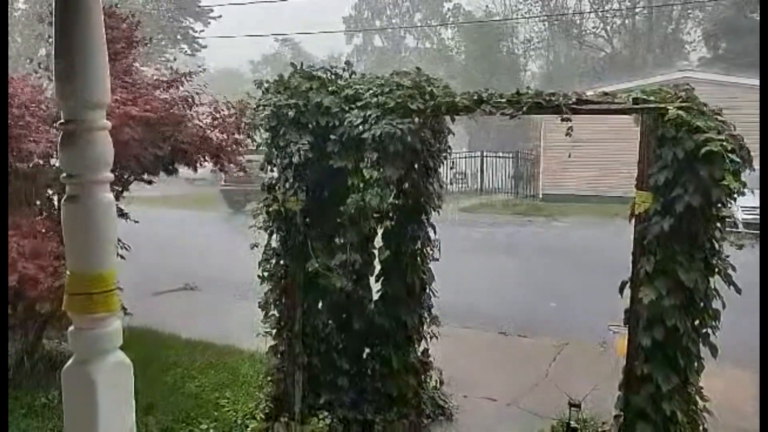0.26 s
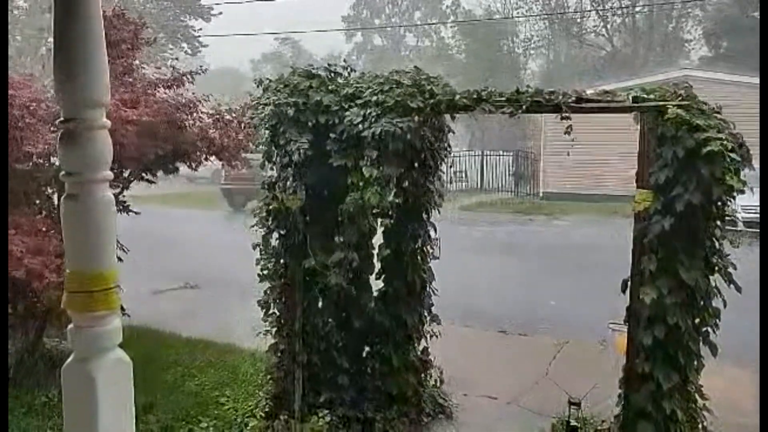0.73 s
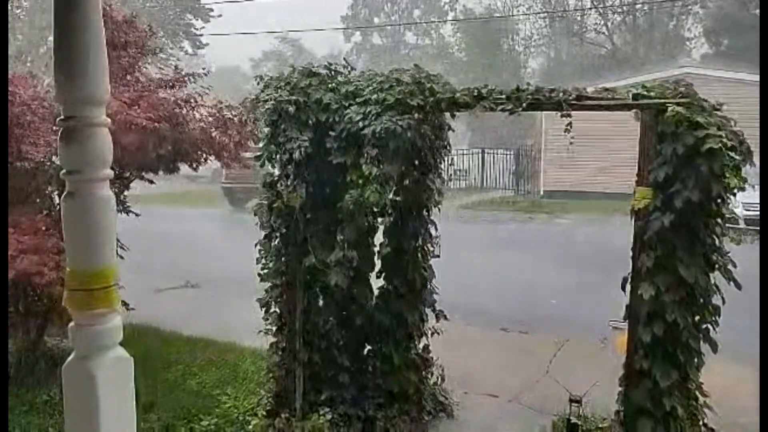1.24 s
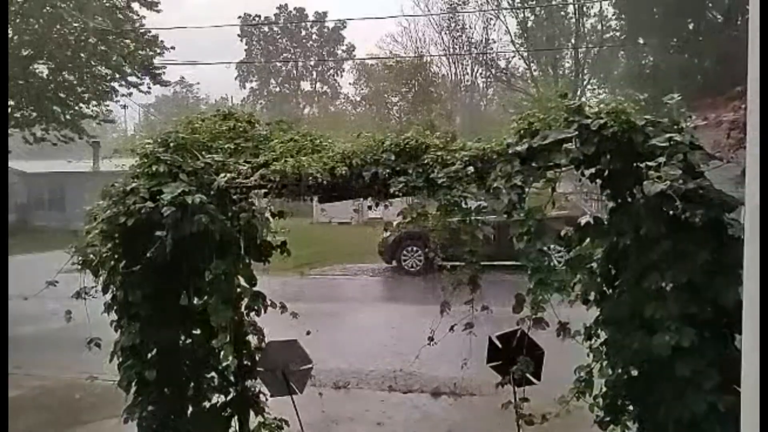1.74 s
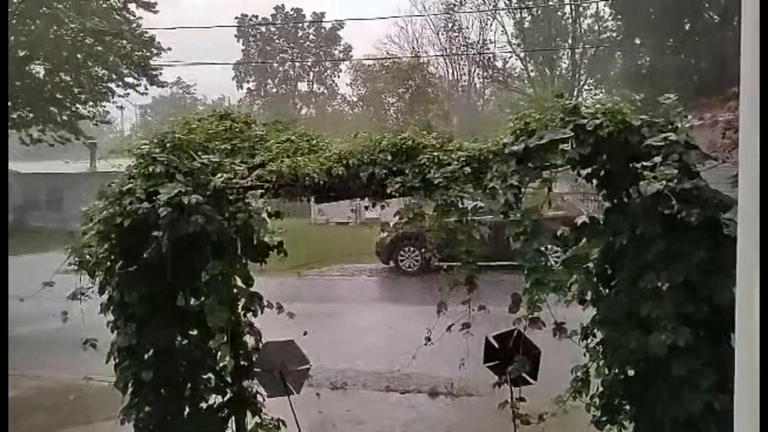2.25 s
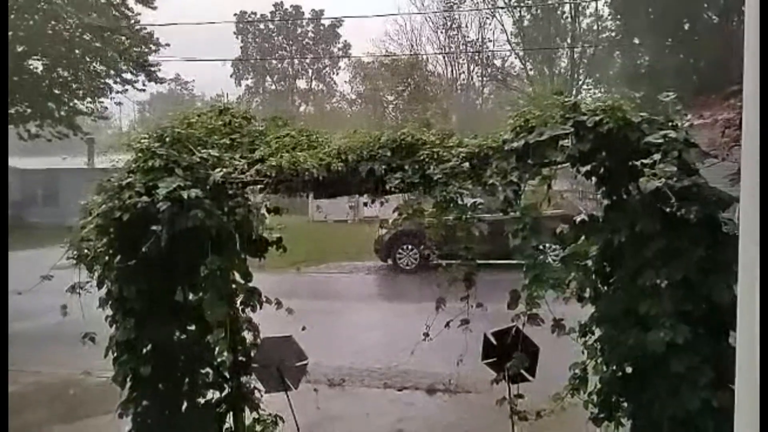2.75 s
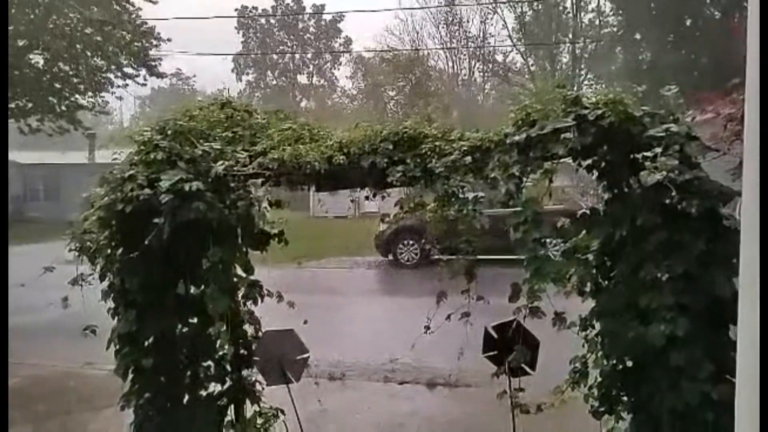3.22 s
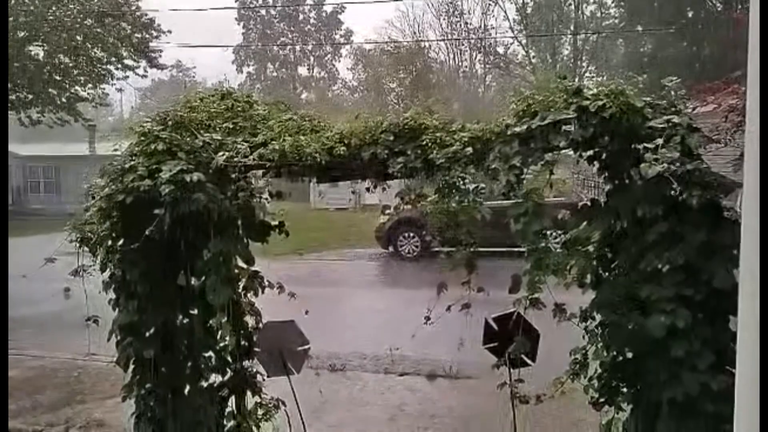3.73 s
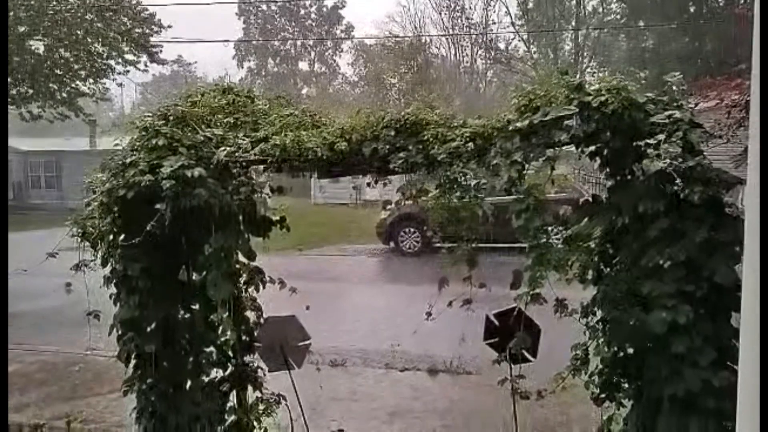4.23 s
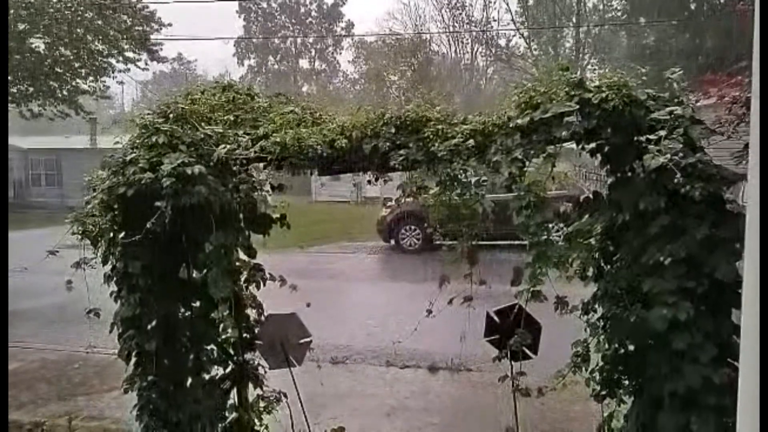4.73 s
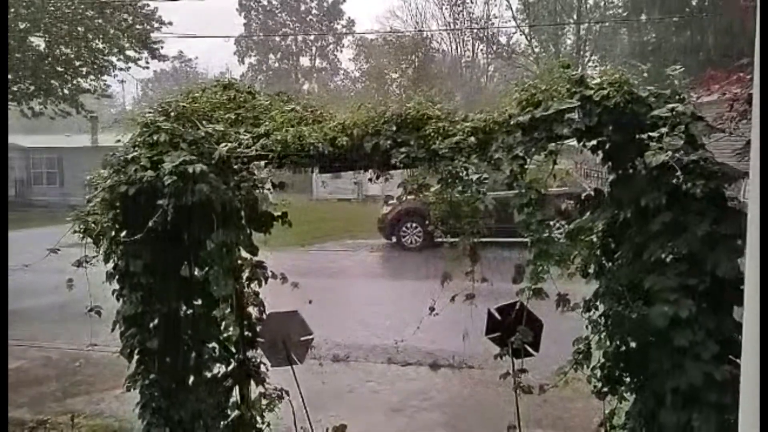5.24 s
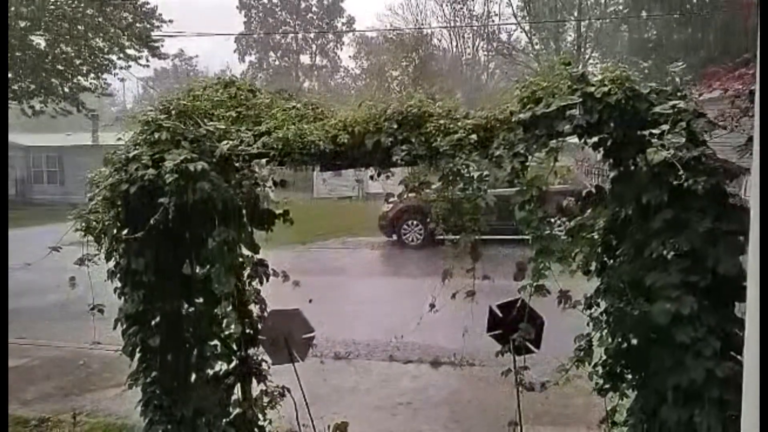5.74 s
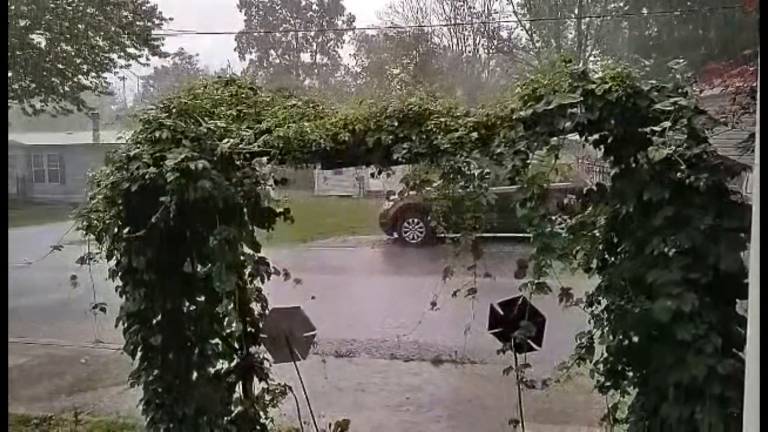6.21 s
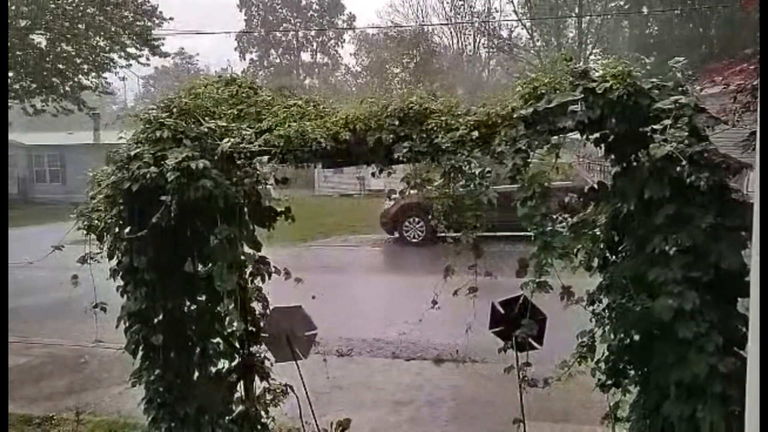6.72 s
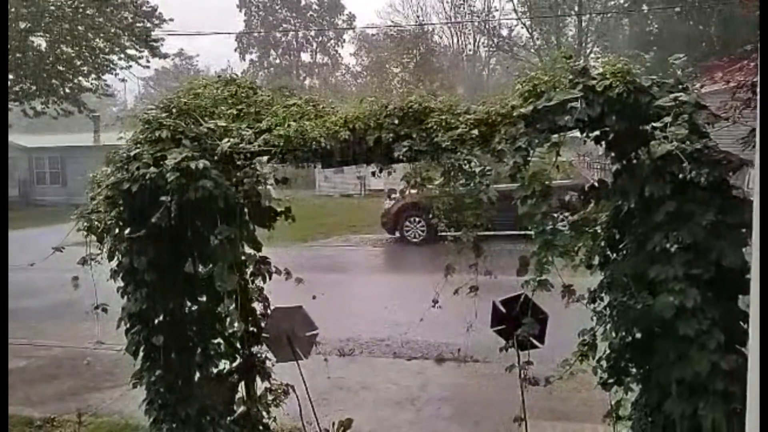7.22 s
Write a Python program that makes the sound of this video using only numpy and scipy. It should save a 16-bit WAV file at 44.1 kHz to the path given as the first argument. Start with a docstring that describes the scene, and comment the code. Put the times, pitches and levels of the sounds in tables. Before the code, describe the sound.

A wavering, windy downpour drops out for a third of a second, then returns as a dense, even rain roar dotted with close drip knocks.

```python
"""Heavy rain on road, lawn and vines, heard from a porch through two ports 0.16 m apart.
First a windy spot: roar wavering left and right, treble spray, low wind; then silence for a third of a second.
A steadier spot follows: the roar starts soft and settles, with a low thump soon after, then porch knocks;
it dips briefly once. Close ticks fall at both spots. Rain is dense noise splashes from sixteen directions,
coloured by band; nearer drops are decaying sines, knocks and ticks noise bursts through resonances."""
import sys
import numpy as np
from scipy import signal
from scipy.fft import rfft, irfft, next_fast_len
from scipy.io import wavfile
from scipy.ndimage import uniform_filter1d

SR = 44100
rng = np.random.default_rng(int(sys.argv[2]) if len(sys.argv) > 2 else 0)


def bounce(signal):
    """Save signal as a 16-bit WAV file at the path given by the first command-line argument."""
    frames = np.transpose(np.atleast_2d(signal))
    limited = np.clip(frames, -1, 1)
    pcm = np.round(limited * 32767).astype(np.int16)
    wavfile.write(sys.argv[1], SR, pcm)


N = 329427
T_S = np.arange(N) / SR

PORT_GAP_M, SOUND_M_PER_S = 0.1582, 343
SILENT_FROM_S, SILENT_TO_S = 1.199, 1.529
WINDY = T_S < SILENT_TO_S


def undb(db):
    """Amplitude gain of a level in dB."""
    return 10 ** (np.asarray(db) / 20)


def unit(x):
    """Scale to RMS 1, both ports together."""
    return x / np.sqrt(np.mean(x ** 2))


def read(table):
    """Columns of a time table, interpolated to one value a sample."""
    time_s, *columns = np.transpose(table)
    return [np.interp(T_S, time_s, column) for column in columns]


def colour(hz, table):
    """Gains of (Hz, dB, ..) points on a log-frequency axis."""
    table_hz, *columns_db = np.transpose(table)
    return undb([np.interp(np.log(hz + 1), np.log(table_hz), db) for db in columns_db])


def sides(pan_db):
    """Left and right gains of a left-minus-right level."""
    return undb(np.array([pan_db, -pan_db]) / 2)


def walk(changes_per_s):
    """Random levels, held and slewed twice; spread near 1."""
    hold = int(SR / changes_per_s)
    held = np.repeat(rng.standard_normal(N // hold + 1), hold)
    slewed = uniform_filter1d(uniform_filter1d(held, hold), hold)
    return 0.87 * slewed[:N]


def bump(middle_s, half_length_s):
    """One smooth rise and fall, height 1."""
    phase = np.clip((T_S - middle_s) / half_length_s, -1, 1)
    return np.cos(np.pi / 2 * phase) ** 2


def band(hz, width_hz):
    """Bandpass resonance, top edge held below Nyquist."""
    edges_hz = [hz - width_hz / 2, min(hz + width_hz / 2, SR / 2.2)]
    return signal.butter(2, edges_hz, "band", fs=SR, output="sos")


def sizes(chance, spread_db):
    """Drop sizes in dB: many small, few big; the largest break up in the air."""
    return spread_db * np.minimum(-np.log(1 - chance), 4)


def levels():
    """Gains of the roar at each port and of the spray: gusty at first, then settling to a steady pour."""
    # roar at the windy spot, slow course: (time [s], level [dB], left minus right [dB])
    roar_windy_spot = [(0, -21, -2.5), (.3, -20.5, -3.5), (.56, -23.5, -3), (.86, -24, -1.5),
                       (.95, -21.5, -3), (1.13, -17.5, 2), (1.195, -18.5, -1.5)]
    # gusts shifting the roar between ports: (middle [s], half length [s], left [dB], right [dB])
    gust_table = [(.105, 0.068, 5.5, 0), (.19, 0.14, 1, 1.5), (0.375, 0.07, 3, 1.5), (0.477, 0.04, 2, 1.5),
                  (0.604, 0.015, 6, -1), (0.658, 0.046, 1, 3), (0.74, 0.1, 6, 2), (0.787, 0.058, -2.5, 3),
                  (0.823, 0.04, 5, -0.5), (0.906, 0.074, 5.5, 0.5)]
    steady_roar_db, steady_pan_db, steady_rise_db_per_s = -17, -1, 0.0931
    windy_spray_db, steady_spray_db = -31.5, -33
    settle_db, settle_s = -5.5, 0.08
    dip_s, dip_half_length_s, dip_db = 4.8, 0.097, -2.5

    windy_db, windy_pan_db = read(roar_windy_spot)
    gusts_db = sum(np.outer(port_db, bump(s, half_s)) for s, half_s, *port_db in gust_table)
    windy_roar = undb(windy_db + gusts_db) * sides(windy_pan_db)

    since_s = T_S - SILENT_TO_S
    course_db = dip_db * bump(dip_s, dip_half_length_s) + steady_rise_db_per_s * since_s
    settling_db = settle_db * np.exp(-np.abs(since_s) / settle_s)
    steady_roar = undb(steady_roar_db + course_db + settling_db) * sides(steady_pan_db)[:, None]

    roar = np.where(WINDY, windy_roar, steady_roar)
    # the spray does not settle
    spray = undb(np.where(WINDY, windy_spray_db, steady_spray_db + course_db))
    return roar, spray


def wind(level_db=-45, centre_hz=130, gust_db=2.):
    """Low buffeting at the windy spot: band noise, unrelated at the two ports."""
    edges_hz = [centre_hz / 1.7, centre_hz * 1.5]
    low_band = signal.butter(3, edges_hz, "band", fs=SR, output="sos")
    low = signal.sosfilt(low_band, rng.standard_normal((2, N)))
    gusts = undb(gust_db * np.array([walk(19), walk(14)]))
    return unit(low * gusts) * undb(level_db) * WINDY


def fizz(per_s=120, level_db=-39, spread_db=3, fade_s=0.0038):
    """Small droplets ticking on leaves near each port: fading treble noise splashes."""
    chance = rng.random((2, 2, N))
    drops = (chance[0] < per_s / SR) * undb(sizes(chance[1], spread_db))
    fade = signal.lfilter([1], [1, -np.exp(-1 / fade_s / SR)], drops)
    splash = fade * rng.standard_normal((2, N))
    return undb(level_db) * signal.sosfilt(band(10500, 6000), splash)


def patter(roar, count=2000, level_db=-4, spread_db=2.5, low_hz=750, octaves=2.306, cycles=4.6, hollow_gain=3.3):
    """Nearer drops on leaves, boards and puddles: each swells softly and rings, longer on hollow things."""
    out, t_s = np.zeros((2, N)), np.arange(int(.07 * SR)) / SR
    port_sign = np.array([[1], [-1]])
    for when, pitch, size, angle, hollow in rng.random((count, 5)):
        hz = low_hz * 2 ** (octaves * pitch)
        slant = np.cos(np.pi * angle)
        delay_s = (1 + slant * port_sign) * PORT_GAP_M / 2 / SOUND_M_PER_S
        late_s = np.maximum(t_s - delay_s, 0)
        age = late_s * hz / (cycles * (1 + hollow_gain * hollow ** 2))
        swell = 1 - np.exp(-6 * age)
        ring = np.sin(2 * np.pi * hz * late_s) * np.exp(-2 * age) * swell
        i = int(when * (N - len(t_s)))
        out[:, i:i + len(t_s)] += ring * undb(sizes(size, spread_db))
    highpass = signal.butter(2, low_hz / 2, "high", fs=SR, output="sos")
    return signal.sosfilt(highpass, out) * roar * undb(level_db)


def drips(table, fade_s, width_share, strike):
    """Each drop is a strike and a sharp burst of noise ringing one broad resonance."""
    out, t_s = np.zeros((2, N)), np.arange(int(.15 * SR)) / SR
    for s, peak_db, hz, pan_db in table:
        noise = rng.standard_normal((2, len(t_s))) * np.exp(-t_s / fade_s)
        push = noise + strike * (t_s == 0)
        ring = band(hz, width_share * hz)
        burst = signal.sosfilt(np.r_[ring, ring], push)
        burst = burst / np.abs(burst).max() * undb(peak_db) * sides(pan_db)[:, None]
        i = int(s * SR)
        out[:, i:i + len(t_s)] += burst[:, :N - i]
    return out


def downpour(size, per_s=500, spread_db=3.5, splash_s=0.0045, far_db=4):
    """Spectra at both ports of drops from sixteen directions (per_s each), over a far even wash."""
    hz = np.arange(size // 2 + 1) * SR / size
    out = 0
    for turn in range(16):
        chance = rng.random((2, N))
        drops = (chance[0] < per_s / SR) * undb(sizes(chance[1], spread_db))
        # each drop is a splash that fades
        power = signal.lfilter([1], [1, -np.exp(-2 / splash_s / SR)], drops ** 2)
        envelope = np.sqrt(power / power.mean() + undb(2 * far_db))
        splashes = envelope * rng.standard_normal(N)
        # a slanting wave reaches one port before the other
        slant = np.cos(np.pi * (turn + .3) / 16)
        lag = np.exp(1j * np.pi * hz * slant * PORT_GAP_M / SOUND_M_PER_S)
        out = out + rfft(splashes, size) * np.array([lag, 1 / lag])
    return hz, out


def rain(roar, spray, split_hz=4740):
    """The downpour in bands, each flickering alone, with a swaying bass; roar below the split, spray above."""
    # rain as each port colours it, relative: (frequency [Hz], left [dB per Hz], right [dB per Hz])
    port_colour = [(30.4, -42, -42), (45, -36.5, -37), (70.6, -26, -28), (126, -21.5, -22), (271, -5, -6),
                   (423, -3.5, -5), (530, -1.5, -1.5), (770, .5, -0.5), (1210, -1.5, -1.5),
                   (1830, -5.5, -3), (2580, -8.5, -10.5), (3680, -7, -16), (4360, -24, -28.5),
                   (5550, -30, -25.5), (7000, -18.5, -24.5), (8530, -23.5, -19.5), (9800, -29, -29),
                   (11600, -29.5, -24.5)]
    # windy spot, less roof boom and more splash: (frequency [Hz], left [dB], right [dB])
    windy_colour = [(130, -4, -10.5), (263, -1.5, 0), (522, -2.5, -5), (875, -1.5, -2), (2020, 3, -3),
                    (2780, 2.5, 2), (3960, 7, 11.5), (4016, 7, 15), (4880, 10, 6), (5630, 3.5, 5),
                    (6920, 1, -1), (12030, -0.5, 3.5)]
    # flicker of each band: (frequency [Hz], depth [dB], rate [changes per s])
    flicker_table = [(60, 3.5, 14), (204, 1, 25), (725, 0.45, 35), (1500, 1.6, 35), (3000, 1.5, 35),
                     (4500, 4.5, 35), (8950, 2.5, 35), (12600, 3, 20)]
    bass_sway_db, bass_sway_per_s, bass_hz = 4.5, 18, 120

    size = next_fast_len(N)
    hz, field = downpour(size)
    field = field * colour(hz, port_colour)
    octave = np.log2(hz + 1)
    # band centres in octaves re 1 Hz, closer in the treble
    centres = np.r_[np.arange(4.5, 10, .5), np.arange(10, 11, .25), np.arange(11, 14, .125)]
    at_hz, depths_db, rates_per_s = np.transpose(flicker_table)
    at_octave = np.log2(at_hz)
    sway_db = bass_sway_db * walk(bass_sway_per_s)
    parts = np.zeros((2, 2, N))  # (roar or spray, port, sample)
    for k, centre in enumerate(centres):
        centre_hz = 2 ** centre
        band_share = np.interp(octave, centres, np.arange(len(centres)) == k)
        x = irfft(field * band_share, size)[:, :N]
        depth_db = np.interp(centre, at_octave, depths_db)
        flicker_db = depth_db * walk(np.interp(centre, at_octave, rates_per_s))
        bass_share = 1 / (1 + (centre_hz / bass_hz) ** 4)
        x = x * undb(flicker_db + sway_db * bass_share)
        spot_gain = np.where(WINDY, colour(centre_hz, windy_colour)[:, None], 1)
        parts[int(centre_hz > split_hz)] += x * spot_gain
    for part in parts:
        for spot in (WINDY, ~WINDY):
            part[:, spot] = unit(part[:, spot])
    return parts[0] * roar + parts[1] * spray


def scene():
    """Sum of wind, droplets, patter, single drips, thump and the rain itself."""
    # heavy drips on the porch: (time [s], peak [dB], ring [Hz], left minus right [dB])
    knock_table = [(1.859, -13, 830, -1.5), (2.4488, -14, 1450, -1), (3.33, -12, 1500, -3),
                   (3.781, -13, 890, -1), (3.986, -10, 1150, .5), (4.043, -13, 1850, -3),
                   (4.83, -3.5, 1300, -6), (4.8435, -12, 930, 2), (5.461, -12, 1850, 0),
                   (5.586, -13, 830, -2), (5.886, -13, 2020, 3), (6.157, -10, 1300, -2),
                   (6.761, -14, 2390, 0), (6.821, -13, 720, -.5), (7.087, -14, 860, -2),
                   (7.383, -12, 900, -.5)]
    # drops splashing close by: (time [s], peak [dB], centre [Hz], left minus right [dB])
    tick_table = [(.258, -17, 8800, 0), (.3077, -27, 11800, -5), (1.5718, -15, 3520, 5),
                  (1.6392, -20, 8500, -3), (2.108, -19, 12100, -9), (2.1104, -22, 12000, -9),
                  (2.5112, -20, 7400, 0), (2.511, -25, 12000, -4.5), (3.0984, -23, 12100, -2),
                  (3.0986, -20, 7600, -2), (3.5618, -18, 7300, -3), (4.1316, -23, 8400, 1),
                  (4.1574, -28, 12000, -2.5), (4.581, -28, 12000, -6), (5.0377, -24, 7100, 2),
                  (5.1312, -28, 12000, -6), (5.3633, -26, 12000, -5), (5.6176, -28, 12000, -4),
                  (5.715, -16, 2900, 3.5), (5.866, -17, 2700, 6), (6.2572, -17, 3210, 3.5),
                  (6.4573, -26, 12000, -3.5), (6.5665, -24, 12000, -6), (6.7418, -24, 8700, -1),
                  (7.004, -27, 12000, -7), (7.4315, -28, 12000, -2.5)]
    # one low thump soon after the sound resumes: (time [s], peak [dB], centre [Hz], left minus right [dB])
    thump_table = [(1.731, -28, 130, 0)]
    roar, spray = levels()
    knocks = drips(knock_table, fade_s=.02, width_share=.7, strike=-12)
    ticks = drips(tick_table, fade_s=.009, width_share=.22, strike=14)
    thump = drips(thump_table, fade_s=.003, width_share=1.1, strike=-28)
    return wind() + fizz() + patter(roar) + thump + ticks + knocks + rain(roar, spray)


def record(dry, top_hz=13020):
    """Sound drops out in 1 ms and returns in 4 ms; peaks clip at 0.96, then the top is cut steeply."""
    fall = (SILENT_FROM_S - T_S) / .001
    rise = (T_S - SILENT_TO_S) / .004
    on = np.clip(np.maximum(fall, rise), 0, 1)
    clipped = np.clip(dry * on, -.96, .96)
    lowpass = signal.ellip(12, .3, 75, top_hz, fs=SR, output="sos")
    return signal.sosfilt(lowpass, clipped)


dry = scene()
out = record(dry)
bounce(out)
```